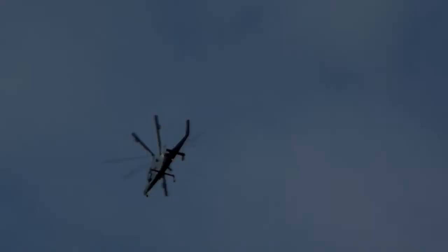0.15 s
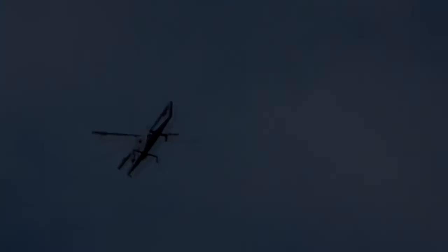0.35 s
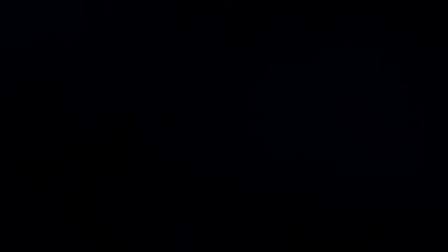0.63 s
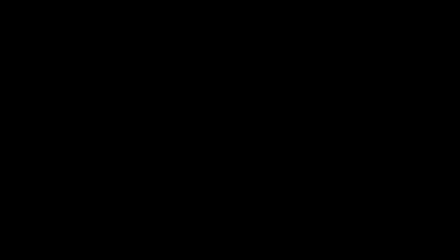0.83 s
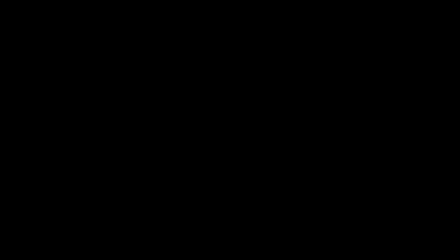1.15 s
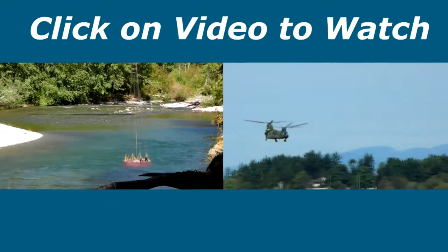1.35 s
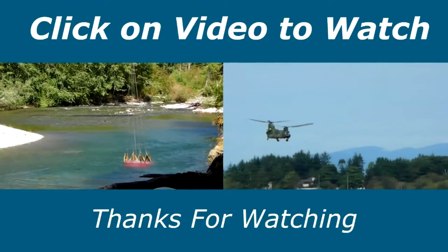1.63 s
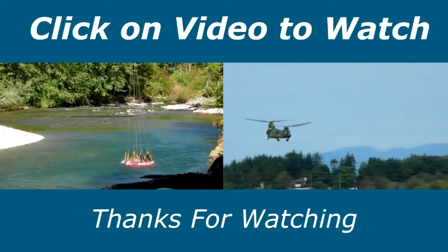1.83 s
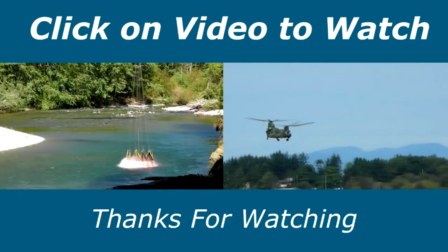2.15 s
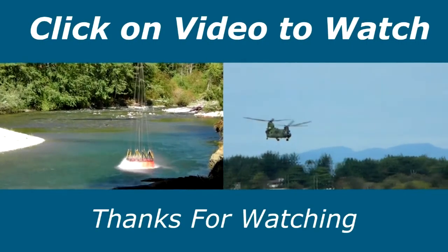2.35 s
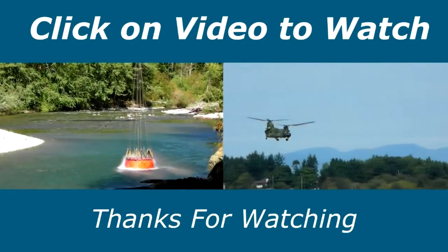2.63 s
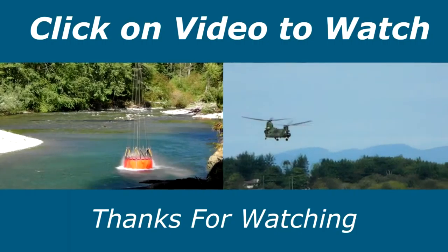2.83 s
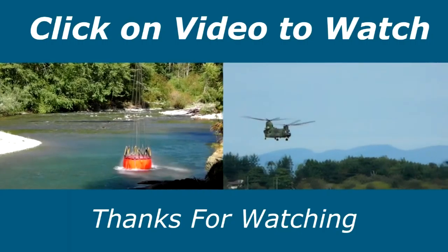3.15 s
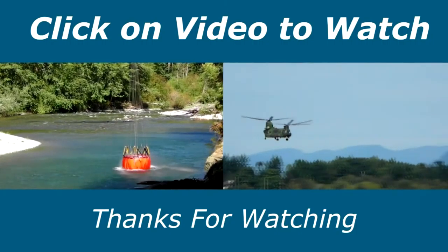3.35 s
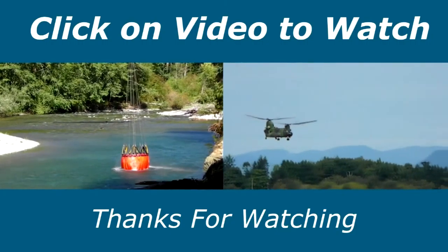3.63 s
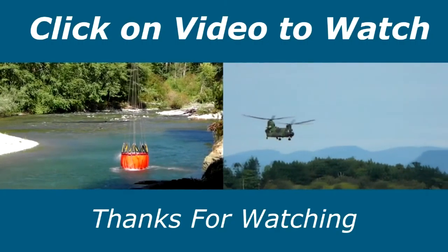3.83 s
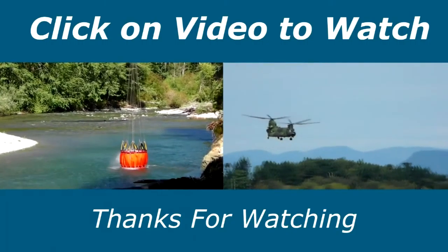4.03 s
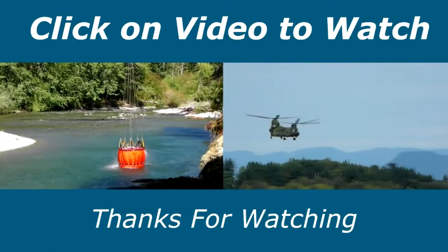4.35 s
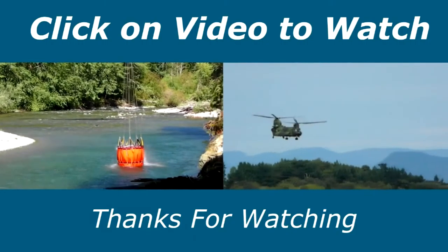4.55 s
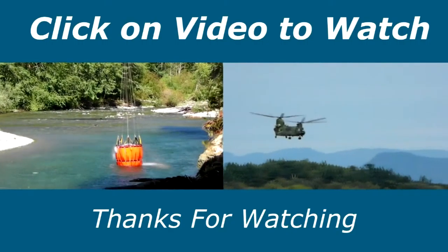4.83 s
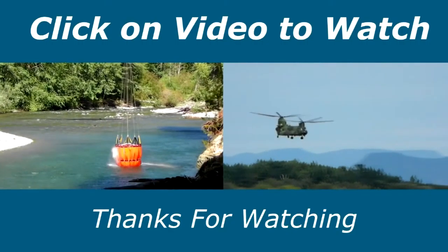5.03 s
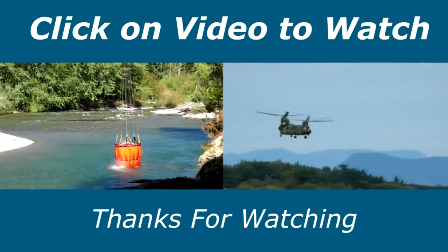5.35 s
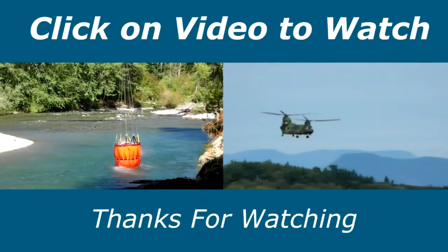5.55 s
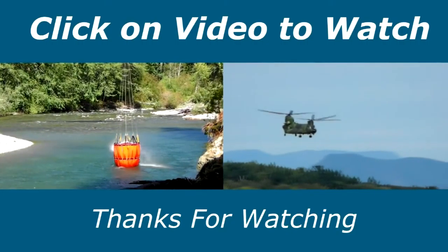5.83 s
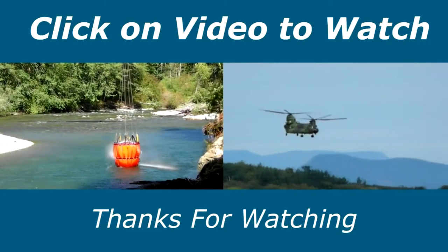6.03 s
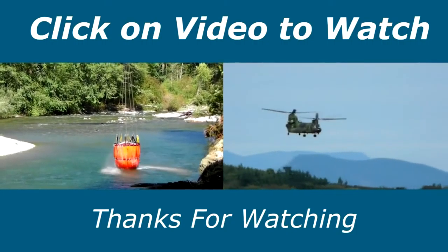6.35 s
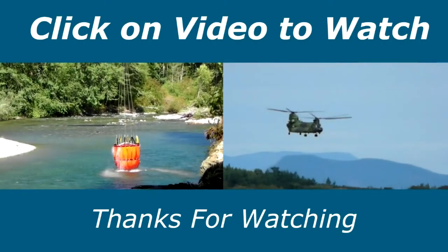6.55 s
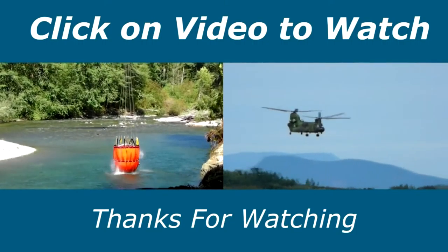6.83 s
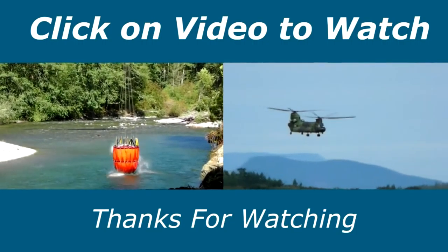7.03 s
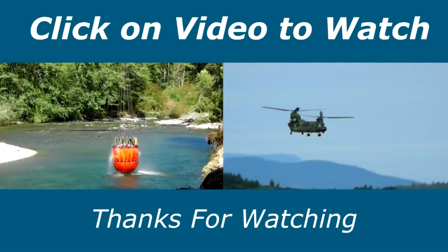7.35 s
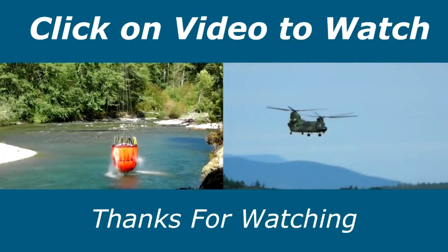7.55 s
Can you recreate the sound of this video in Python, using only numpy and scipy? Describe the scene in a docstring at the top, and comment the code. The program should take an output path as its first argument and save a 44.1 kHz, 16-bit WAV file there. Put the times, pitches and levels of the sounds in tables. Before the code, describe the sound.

The swishing, thumping rotor and faint engine whine of a small helicopter die away into a short silent gap. Then a heavy helicopter with two rotors grows louder, heard from the ground in open country. Rapid, regular blade slaps ride over a low hum, roaring turbines and fine hiss. The beating turns sharpest a little past the middle, then eases and surges as it carries on to the end.

```python
"""Outdoors, among open ground and trees, a light two-blade helicopter passes overhead, thumping and swishing,
and fades to silence. Then a tandem (two-rotor) helicopter fades in over the roar of its turbines. Its rotors
slap in turn, each 14 times a second, as the blades hit the swirls of air left by the blade tips. The hardest
slaps overload a limiter, which briefly turns the sound down. The same stretch of the tandem's sound is heard
twice: it comes round again after about 4.3 seconds."""
import sys
import numpy as np
from scipy import signal
from scipy.fft import rfft, irfft
from scipy.io import wavfile
from scipy.ndimage import uniform_filter1d

SR = 44100
rng = np.random.default_rng(int(sys.argv[2]) if len(sys.argv) > 2 else 0)


def wav_record(signal):
    """Record a signal, one row per channel, as 16-bit PCM in the file named by sys.argv[1]."""
    frames = np.transpose(np.atleast_2d(signal))
    bounded = np.clip(frames, -1, 1)
    # unit amplitude maps onto the largest positive 16-bit level
    quanta = np.round(bounded * 32767).astype(np.int16)
    wavfile.write(sys.argv[1], SR, quanta)


N = 339129
TIME = np.arange(N) / SR

# how loud the light helicopter's blade swish and turbine whine are: t/s, level/dB
SWISH_LEVEL = [(0, -22), (.13, -23.5), (.24, -27), (.28, -18.5), (.35, -28.5), (.36, -16.5), (.43, -24),
               (.48, -16.5), (.53, -28), (.57, -20), (.64, -28), (1.1, -22)]
WHINE_LEVEL = [(0, -54), (.18, -45.5), (.35, -54.5), (.55, -74), (.69, -53), (.83, -49), (.96, -59),
               (1.06, -53)]
# its engine tones: f/Hz, level/dB
ENGINE_TONES = [(883, -42), (1001, -51.5)]
# narrow bands where its swish rings: f/Hz, width/Hz, strength/dB
SWISH_PEAKS = [(1942, 47, -4), (2144, 18, 2.5), (2567, 64, -5)]
# the colour of each sound, meaning its balance of low and high pitches: f/Hz, relative level/dB
THUMP_COLOUR = [(40, -27), (95, -3), (170, -13), (230, -0.5), (300, 1), (370, -2.5), (450, 3), (560, -15),
                (2000, -65)]
SWISH_COLOUR = [(900, -39.5), (1500, -24.5), (1750, -4.5), (2000, -1), (2250, -4), (2550, -9),
                (2900, -16.5), (3500, -29), (4400, -35.5), (5200, -48), (9000, -72)]
LIGHT_WASH_COLOUR = [(30, -35.5), (100, -10.5), (190, -18), (300, -3.5), (560, 1), (880, 2), (1100, -2.5),
                     (1500, -0.5), (2200, -17.5), (5000, -42)]
SLAP_COLOUR = [(20, -28), (60, -7), (120, -1), (250, 6), (370, 3.5), (520, -3), (720, -1), (920, -4.5),
               (1250, -22), (2300, -22.5), (5000, -39), (12000, -62)]
ANSWER_COLOUR = [(25, -29), (110, -21), (250, -16), (390, -2.5), (520, -3), (750, -26.5), (1100, -29),
                 (5000, -80)]
TANDEM_WASH_COLOUR = [(20, -30), (60, -37), (130, -1), (300, 5), (450, 1.5), (720, 6.5), (1000, -2),
                      (1350, -1.5), (1700, -16), (3000, -52)]
ROAR_COLOUR = [(700, -2.5), (1400, 1), (1900, 3.5), (2800, 2), (3400, -3), (4400, -9.5), (5200, -20.5),
               (7000, -36), (9000, -52), (15000, -57)]
SIZZLE_COLOUR = [(3500, -4), (5600, -5.5), (7200, -23), (10000, -31)]
HISS_COLOUR = [(2000, -2), (7000, 7), (9500, 4.5), (11500, -0.5), (13500, -9), (15800, -15.5)]
# how hard the tandem's blades strike: t/s, slap level/dB, level of its sharp snap/dB
SLAP_LEVEL = [(3.44, -13, -48), (3.73, -8, -27), (4.01, -12, -31), (4.3, -7, -20), (4.55, -10, -23),
              (4.88, -8.5, -26), (5.2, -3, -16), (5.3, -11.5, -35), (5.48, -12, -25), (5.59, -13, -46),
              (5.88, -15.5, -37), (6.2, -9.5, -24), (6.55, -7.5, -35), (6.74, -10, -27), (6.88, -8.5, -20),
              (7.1, -12.5, -30), (7.31, -17, -46), (7.59, -13.5, -50)]
# slaps that stand out: t/s, hollow ring level/dB, ring f/Hz, high crack level/dB
ACCENTS = [(3.55, -26, 760, -28), (4.55, -25, 790, -17), (4.63, -12.5, 740, -13), (4.70, -11, 767, -8.5),
           (4.77, -20, 730, -16), (4.84, -15.5, 700, -12.5), (5.06, -13, 645, -23), (5.13, -8, 680, -12),
           (5.28, -19, 810, -27), (5.35, -14, 760, -19.5), (5.42, -14.5, 706, -19), (5.49, -15, 640, -30),
           (6.20, -14.5, 780, -14), (6.34, -16, 800, -16), (6.42, -17, 836, -20), (6.84, -13, 740, -27),
           (7.63, -17, 810, -31)]
# base levels over time: t/s, answering slap against leading slap/dB, wash/dB, roar/dB, hiss/dB
BASE_LEVELS = [(3.44, 0.5, -32, -38.5, -55.5), (4.01, -3, -27.5, -29.5, -55), (4.3, -6, -33, -38, -57.5),
               (4.74, -3, -27.5, -30, -60.5), (5.02, -4.5, -33, -32.5, -60.5), (5.46, -4, -26, -34, -61),
               (5.59, -13, -29, -38, -52.5), (6.7, -5, -27, -34.5, -55), (7.05, -8.5, -28, -37, -56.5),
               (7.31, -5.5, -28, -32.5, -55.5), (7.59, -4, -31, -36.5, -53)]
# bands lifted or dipped as two sound paths mix: t/s, lowest band f/Hz, lift/dB
PHASING = [(3.4, 254, -1), (4.9, 800, 1.5), (5.2, 680, 2), (5.52, 630, 0), (5.6, 1300, -2), (6.05, 1160, 0),
           (6.6, 626, 2.5), (6.85, 585, 1), (7.05, 380, 3.5), (7.25, 273, 3), (7.69, 268, -1)]
# the tandem's two legs (stretches) of flight: start t/s, time between beats/s, its growth per beat/s
LEGS = [(3.4035, .07172, .000026), (5.5597, .0713, 0)]
# how close it is on each leg, from 0 (far) to 1 (near): at the start, at the end
NEARNESS = [(0.27, 0.91), (0.03, 0.27)]
# its low hum: multiple of the beat rate, level when far/dB, level when near/dB
HUM_TONES = [(4, -45, -54), (6, -63, -45.5), (8, -40.5, -49.5), (9, -49.5, -64), (10, -56, -49),
             (11, -54, -42.5)]
# small ticks and rustles nearby: t/s, starting level/dB, centre f/Hz, width/octaves, decay/s
TICKS = [(0.33, -38, 10400, 0.22, 0.0013), (.332, -51, 5500, 0.23, 0.018), (0.339, -50, 12300, 0.82, 0.038),
         (6.118, -37, 6000, 0.51, 0.0085), (6.171, -40, 6590, 0.5, 0.0056),
         (6.194, -34.5, 6800, 0.49, 0.0064)]
# narrow bands taken out of the whole sound: f/Hz, width/Hz
NOTCHES = [(195, 49), (7900, 990)]

LOOP_START_S, LOOP_S, LEG_BEATS = 3.4035, 4.296, 30  # the tandem's repeating pattern
LAG_FAR_S, LAG_NEAR_S = .0365, .027  # the other rotor answers sooner as the helicopter nears
SILENCE_START_S, SILENCE_END_S = 1.141, 1.366


def amp(db):
    """Turns decibels into a number to multiply by."""
    return 10 ** (np.asarray(db) / 20)


def unit_level(x):
    """Scales a signal so that its average (rms) level is 1."""
    return x / np.sqrt(np.mean(x ** 2) + 1e-20)


def follow(table, t):
    """Reads a table's columns at times t, sliding between its rows."""
    times, *columns = np.transpose(table)
    return [np.interp(t, times, column) for column in columns]


def looped(t):
    """Where times t fall within the repeating pattern."""
    return LOOP_START_S + (t - LOOP_START_S) % LOOP_S


def colour_db(colour, hz):
    """Reads a colour table at the given frequencies."""
    f, db = np.transpose(colour)
    return np.interp(np.log(hz + 1), np.log(f), db)


def add(mix, s, sound):
    """Mixes in a sound that starts at time s."""
    part = mix[max(round(s * SR), 0):][:len(sound)]
    part += sound[:len(part)]


def add_centred(mix, s, sound):
    """Mixes in a sound whose middle falls at time s."""
    add(mix, s - len(sound) / 2 / SR, sound)


def noise(colour, peaks=()):
    """Noise of a given colour, lifted at any narrow peaks."""
    hz = np.fft.rfftfreq(N, 1 / SR)
    lift = 1 + sum(2 * amp(db) / (1 + (2 * (hz - f) / width) ** 2) for f, width, db in peaks)
    return unit_level(irfft(rfft(rng.standard_normal(N)) * amp(colour_db(colour, hz)) * lift, N))


def drift(rate):
    """A random wobble of about size 1, changing up to about rate times a second."""
    hz = np.fft.rfftfreq(N, 1 / SR)
    return unit_level(irfft(rfft(rng.standard_normal(N)) / (1 + (hz / rate) ** 4), N))


def wavering_tone(hz, waver_hz, rate):
    """A pure tone whose pitch wobbles at random."""
    return np.sin(2 * np.pi * np.cumsum(hz + waver_hz * drift(rate)) / SR)


def pulse(colour, knock_db=0, size=2048):
    """One blade pulse: suction builds, snaps to pressure and dies away. The knock makes it hollow."""
    hz = np.fft.rfftfreq(size, 1 / SR)
    knock = np.exp(-(np.log2((hz + 1) / 760) / .93) ** 2)
    lean = np.exp(-1j * (np.pi / 2 + .3))  # the suction is deeper than the pressure
    wave = np.roll(irfft(lean * amp(colour_db(colour, hz) + knock_db * knock)), size // 2)
    return wave / abs(wave).max()


def echo(x, delay_s, gain):
    """One late copy of a sound, as when it bounces off the ground."""
    return gain * np.interp(TIME - delay_s, TIME, x, left=0)


def terrain(x, die_away_s, top_hz):
    """Dull, scattered echoes from ground and trees."""
    t = TIME[:SR // 2]
    tail = rng.standard_normal(len(t)) * amp(-60 * t / die_away_s) * (t > .006)
    tail = signal.sosfilt(signal.butter(2, top_hz, fs=SR, output="sos"), tail / np.linalg.norm(tail))
    return signal.oaconvolve(x, tail)[:N]


def approach(t):
    """Beats so far on the current leg, and how near the tandem has come (0 to 1), at times t."""
    t, legs = looped(t), np.array(LEGS)
    leg = np.maximum(np.searchsorted(legs[:, 0], t, "right") - 1, 0)
    start, period, slowing = legs[leg].T
    first, last = np.array(NEARNESS)[leg].T
    beats = (t - start) / period
    beats = beats - slowing * beats ** 2 / period / 2
    return beats, np.clip(first + (last - first) * beats / LEG_BEATS, 0, 1)


def phasing(x, top_hz=2050):
    """Sound arrives by two paths that add and cancel in gliding bands, fainter higher up."""
    hz, t, spectrum = signal.stft(x, SR, nperseg=1024, noverlap=768)
    lowest_hz, lift_db = follow(PHASING, looped(t))
    multiple = np.maximum(hz[:, None] / lowest_hz, .5)
    bands = -np.cos(np.pi * multiple) / (1 + (hz[:, None] / top_hz) ** 2)
    return signal.istft(spectrum * amp(lift_db * bands), SR, nperseg=1024, noverlap=768)[1][:N]


def limiter(x, threshold_db, recovery_db_per_s, ceiling):
    """Each hard slap turns the volume down; its very front gets through and is cut flat."""
    recovery_db = TIME * recovery_db_per_s
    held_peak_db = np.maximum.accumulate(20 * np.log10(abs(x) + 1e-9) + recovery_db) - recovery_db
    over_db = np.maximum(held_peak_db - threshold_db, 0)
    smoothing = np.exp(-1 / (.00011 * SR))
    cut_db = signal.lfilter([1 - smoothing], [1, -smoothing], over_db)
    return np.clip(x / amp(cut_db), -ceiling, ceiling)


def ticks():
    """Ticks and rustles: short bright bursts of noise; those in the pattern come round twice."""
    out, t = np.zeros(N), TIME[:SR // 4]
    hz = np.fft.rfftfreq(len(t), 1 / SR)
    for s, db, centre_hz, octaves, decay_s in TICKS:
        band = np.exp(-(np.log2((hz + 1) / centre_hz) / octaves) ** 2 / 2)
        rustle = unit_level(irfft(rfft(rng.standard_normal(len(t))) * band, len(t)))
        burst = amp(db) * rustle * np.exp(-t / decay_s)
        add(out, s, burst)
        if s > LOOP_START_S:
            add(out, s - LOOP_S, burst)
    return out


def whistle(start_s=3.48, length_s=.2, from_hz=3850, to_hz=3690, db=-47):
    """A faint whistle swells, falls in pitch and is gone."""
    progress = np.clip((TIME - start_s) / length_s, 0, 1)
    hz = from_hz + (to_hz - from_hz) * progress
    return amp(db) * np.sin(np.pi * progress) * wavering_tone(hz, waver_hz=12, rate=72)


def grainy_hiss(patchy_db=3.5):
    """A fine hiss, broken into grains a few milliseconds long."""
    spectrum = signal.stft(noise(HISS_COLOUR))[2]
    patches = unit_level(uniform_filter1d(rng.standard_normal(spectrum.shape), size=7, axis=0))
    return unit_level(signal.istft(spectrum * amp(patchy_db * patches))[1][:N])


def light_wash():
    """The steady rush of air from the light rotor, mixed with its bounce off the ground."""
    wash = noise(LIGHT_WASH_COLOUR)
    return amp(-32) * unit_level(wash + echo(wash, .007, .32))


def light_engine():
    """The turbine's high whine comes and goes over lower, wavering engine tones."""
    whine = amp(follow(WHINE_LEVEL, TIME)[0]) * wavering_tone(4570, waver_hz=8, rate=30)
    return whine + sum(amp(db + 3.4 * drift(rate=17)) * wavering_tone(hz, waver_hz=7, rate=23)
                       for hz, db in ENGINE_TONES)


def blade_swish():
    """The blades cut the air with a swish that surges and flutters."""
    return amp(follow(SWISH_LEVEL, TIME)[0] + 1.1 * drift(rate=99)) * noise(SWISH_COLOUR, SWISH_PEAKS)


def blade_thumps(first_s=.0902, period_s=.1125, db=-23.5, uneven_db=1.5):
    """Two blades thump, strong and weak in turn, and echo off the ground."""
    thumps, shape = np.zeros(N), pulse(THUMP_COLOUR)
    for k, s in enumerate(np.arange(first_s, SILENCE_START_S, period_s)):
        add_centred(thumps, s, amp(db + (-1) ** k * uneven_db) * shape)
    return thumps + echo(thumps, .00664, .48) + amp(-4) * terrain(thumps, die_away_s=.09, top_hz=700)


def light_helicopter():
    """Thumps and swish over rushing air, the engine and a faint hiss."""
    return blade_thumps() + blade_swish() + light_wash() + light_engine() + amp(-69) * noise(HISS_COLOUR)


def rotor_hum(beats, near):
    """The tandem's rotors hum at whole multiples of their beat rate."""
    shift = np.tanh(3.3 * near)  # the hum changes colour early in the approach
    return sum(amp(far_db + shift * (near_db - far_db)) * np.sqrt(2) * np.sin(2 * np.pi * k * beats)
               for k, far_db, near_db in HUM_TONES)


def tandem_wash(db):
    """The fluttering rush of air from both rotors."""
    return amp(db + .83 + 1.26 * drift(rate=47)) * noise(TANDEM_WASH_COLOUR)


def turbine_roar(db, near):
    """The roar and its ground bounce; close by it sizzles, as the air soaks up less treble."""
    roar = noise(ROAR_COLOUR) + amp(-10) * near * noise(SIZZLE_COLOUR)
    return amp(db) * (roar + echo(roar, .0028 + .00008 * drift(rate=3), .3))


def slap_times(wander_s=.0006, latest_at_s=4.78, cycle_s=1.432):
    """When the leading rotor strikes, drifting a little early and late, over two rounds of the pattern."""
    k = np.arange(LEG_BEATS)
    times = np.concatenate([start + period * k + slowing * k ** 2 / 2 for start, period, slowing in LEGS])
    times += wander_s * np.cos(2 * np.pi * (times - latest_at_s) / cycle_s)
    return np.concatenate([times - LOOP_S, times])


def accents(times, ring_swell_s=.0018, crack_hz=1250, crack_decay_s=.0016):
    """Some slaps stand out: they ring hollow and crack higher up."""
    out, t = np.zeros(N), TIME[:SR // 30]
    swell = t / ring_swell_s * np.exp(1 - t / ring_swell_s)
    for at, ring_db, ring_hz, crack_db in ACCENTS:
        hz = crack_hz * rng.normal(1, .06)
        ring = amp(ring_db) * np.sin(2 * np.pi * ring_hz * t) * swell
        crack = amp(crack_db) * np.sin(2 * np.pi * hz * t) * np.exp(-t / crack_decay_s)
        for s in times[abs(looped(times) - at) < .02]:
            add(out, s, -ring - crack)  # suction comes first
    return out


def blade_slaps(times, snap_decay_s=.000025, bass_cut_hz=61.5):
    """Blades hit swirls of air: one rotor cracks once, the other answers with three quick strikes."""
    times = times[times > 1]
    out = np.zeros(N)
    snap = np.exp(-TIME[:SR // 1000] / snap_decay_s)  # the steep edge from suction to pressure
    for s in times:
        # no two slaps are quite alike
        force, knock, bounce, lag, spacing, answer_force, answer_knock = rng.standard_normal(7)
        slap_db, snap_db = follow(SLAP_LEVEL, looped(s))
        near = approach(s + LAG_FAR_S)[1]
        crack = amp(slap_db + .45 * force) * pulse(SLAP_COLOUR, knock_db=-1.5 + .26 * knock)
        add_centred(out, s + .0004, crack)
        add(out, s + .00067, amp(snap_db) * snap)
        add_centred(out, s - .0019, .15 * near * crack)  # close by, the blade grazes another swirl first
        add_centred(out, s + .00321 + .00015 * bounce, .23 * crack)  # ground bounce
        answer_db = slap_db + follow(BASE_LEVELS, looped(s))[0] - 3.5 + answer_force
        answer = amp(answer_db) * pulse(ANSWER_COLOUR, knock_db=3 * answer_knock)
        answer_s = s + LAG_FAR_S + near * (LAG_NEAR_S - LAG_FAR_S) + .00017 * lag
        for k, share in enumerate((.55, .9, .5)):
            add_centred(out, answer_s + k * (.002873 + .00016 * spacing), share * answer)
        add_centred(out, s + .052 + .00045 * spacing, .29 * answer)  # a weak strike before the next crack
    out += accents(times)
    # the microphone's bass cut makes a low thud trail each slap
    out = signal.sosfilt(signal.butter(2, bass_cut_hz, "high", fs=SR, output="sos"), out)
    return out + amp(-14.5) * terrain(out, die_away_s=.24, top_hz=900)


def tandem_helicopter():
    """Slaps over hum, hiss, rushing air and turbine roar; the last two swell as the slaps get harder."""
    beats, near = approach(TIME)
    slap_db = follow(SLAP_LEVEL, looped(TIME))[0]
    wash_db, roar_db, hiss_db = follow(BASE_LEVELS, looped(TIME))[1:]
    wash = tandem_wash(wash_db + .4 * slap_db)
    gusts = drift(rate=59)  # shake the roar and the hiss together
    roar = turbine_roar(roar_db + .24 * slap_db + 1.44 * gusts, near)
    hiss = amp(hiss_db + 2 * gusts) * grainy_hiss()
    return phasing(blade_slaps(slap_times()) + wash + roar) + rotor_hum(beats, near) + hiss + whistle()


def scene():
    """The two helicopters, one after the other; only the tandem goes through the limiter."""
    tandem = limiter(tandem_helicopter(), threshold_db=-8.5, recovery_db_per_s=80, ceiling=.338)
    switch_s = (SILENCE_START_S + SILENCE_END_S) / 2
    return (np.where(TIME < switch_s, light_helicopter(), tandem) + ticks())[None]


def fade(silent_s, full_s):
    """A volume curve that eases between silence and full level."""
    return np.sin(np.pi / 2 * np.clip((TIME - silent_s) / (full_s - silent_s), 0, 1)) ** 1.627


def record(dry):
    """Fades down to the silence and up again, then takes out two narrow bands and the highest treble."""
    fade_out = fade(silent_s=1.252, full_s=-.12) * np.clip((SILENCE_START_S - TIME) / .047, 0, 1)
    fade_in = fade(silent_s=1.176, full_s=3.32) * np.clip((TIME - SILENCE_END_S) / .012, 0, 1)
    x = dry[0] * (fade_out + fade_in)
    for hz, width in NOTCHES:
        x = signal.lfilter(*signal.iirnotch(hz, hz / width, SR), x)
    treble_cut = signal.firwin(511, 15700, window=("kaiser", 9), fs=SR)
    return signal.oaconvolve(x, treble_cut, "same")[None]


dry = scene()
out = record(dry)
wav_record(out)
```